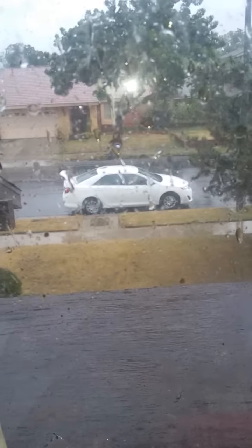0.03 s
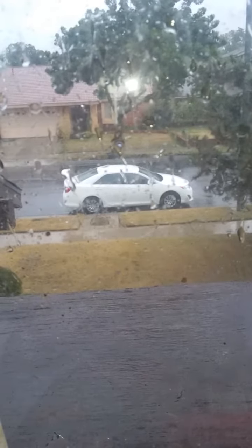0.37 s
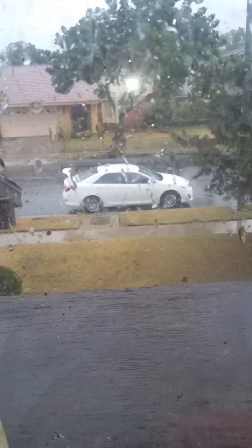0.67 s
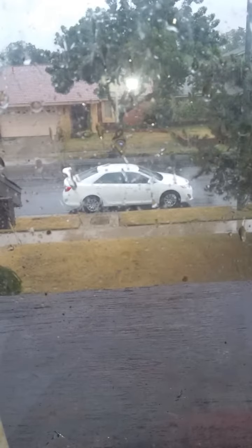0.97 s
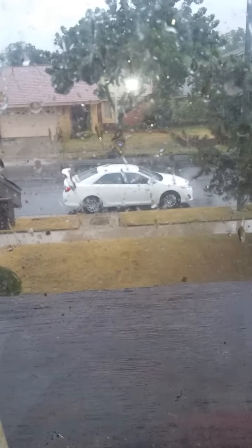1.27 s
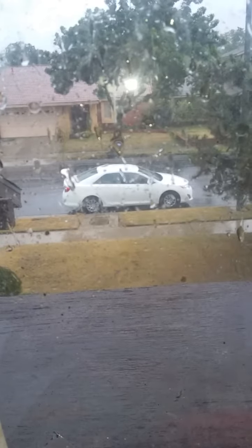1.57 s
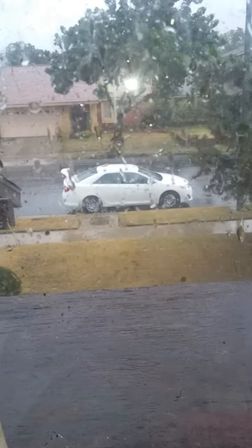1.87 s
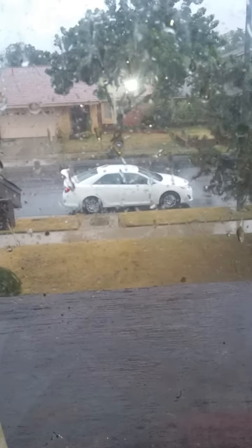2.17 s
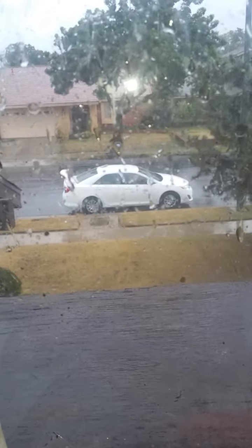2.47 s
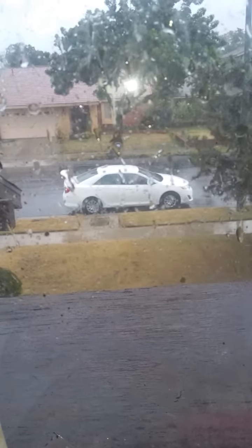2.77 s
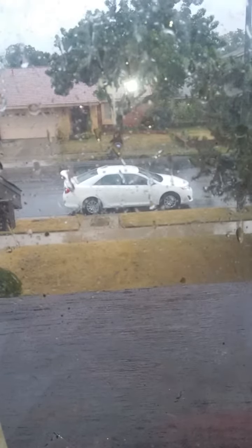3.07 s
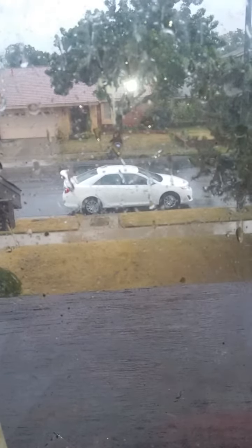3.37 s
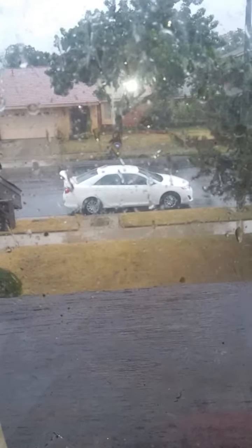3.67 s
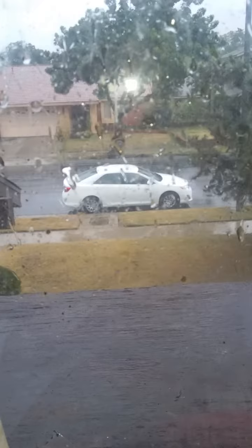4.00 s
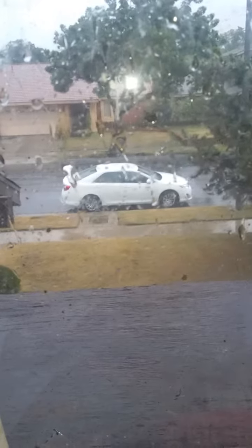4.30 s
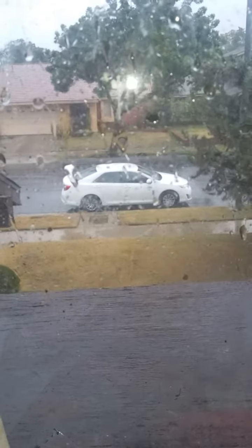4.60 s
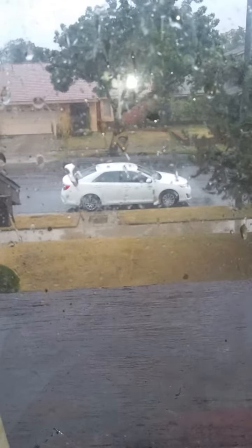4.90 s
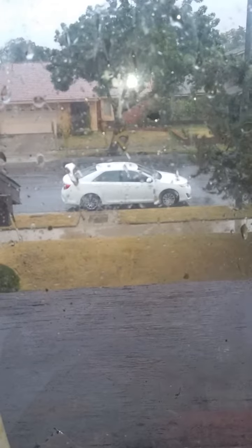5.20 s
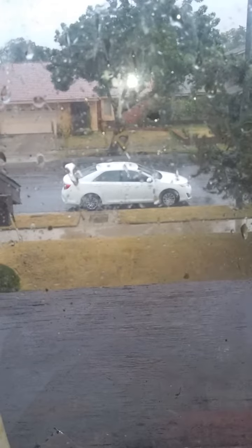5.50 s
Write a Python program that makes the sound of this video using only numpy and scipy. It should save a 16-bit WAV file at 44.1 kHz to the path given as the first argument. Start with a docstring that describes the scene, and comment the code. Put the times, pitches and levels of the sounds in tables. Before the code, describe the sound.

Steady rain hisses outside a window over a low wind drone, swelling and dipping unevenly, with three close drop ticks.

```python
"""Steady rain on a quiet street, heard from behind a window.
From the start, a wash of far drops and a finer near patter lie over a low drone of wind at the frame.
The level swells unevenly, with brief dips, to peaks near 2 s and 3 s, sinks at 4 s, swells, then fades.
Along the way fat drops tick close by: at 1.5 s, loudest at 3.3 s, last at 5.2 s."""
import sys
import numpy as np
from scipy import signal
from scipy.fft import rfft, irfft
from scipy.io import wavfile
from scipy.ndimage import uniform_filter1d

SR = 44100
rng = np.random.default_rng(int(sys.argv[2]) if len(sys.argv) > 2 else 0)


def pcm_store(signal):
    """Save signal as 16-bit PCM."""
    levels = np.round(np.clip(np.atleast_2d(signal), -1, 1) * 32767)
    wavfile.write(sys.argv[1], SR, levels.astype(np.int16).T)


N = 249165
USUAL_HISS_DB = -69.5  # reference for flutter and drone


def from_db(db):
    """Decibels to gain."""
    return 10 ** (np.asarray(db) / 20)


def rms_one(x):
    """Scale to rms 1."""
    return x / np.sqrt(np.mean(x ** 2) + 1e-20)


def level_db(x, window_s):
    """Running rms level."""
    power = uniform_filter1d(x ** 2, round(window_s * SR))
    return 10 * np.log10(np.maximum(power, 1e-14))


def curve(rows):
    """Interpolate (seconds, value) rows at every sample."""
    times_s, values = np.transpose(rows)
    return np.interp(np.arange(N) / SR, times_s, values)


def band(x, low_hz, high_hz):
    """Gentle band-pass."""
    return signal.sosfilt(signal.butter(2, [low_hz, high_hz], "band", fs=SR, output="sos"), x)


def drift(rate_hz):
    """Smooth random wander, rms about 1."""
    hop, settle = 40, 2000
    pole = np.exp(-2 * np.pi * rate_hz * hop / SR)
    noise = rng.standard_normal(N // hop + settle + 2)
    slow = signal.lfilter([1], [1, -2 * pole, pole * pole], noise)[settle:]
    return np.interp(np.arange(N) / hop, np.arange(len(slow)), rms_one(slow))


def hiss_level_db():
    """Level of the rain's hiss: slow swell, brief bell-shaped dips, random flutter."""
    # Slow swell and sinking of the hiss level. Each row: time in seconds, level in dB.
    swell = [(0.0, -79), (0.22, -72.5), (0.48, -80.5), (0.64, -75.5), (0.99, -66.5), (1.43, -67.5),
             (1.83, -62.5), (2.35, -64), (2.52, -74), (2.64, -69), (3.06, -63.5), (3.8, -72.5),
             (3.99, -81.0), (4.25, -68.2), (4.68, -63), (4.76, -69.0), (5.53, -72.1), (5.65, -80.3)]
    # Brief drops in level. Each row: centre in seconds, depth in dB, half-length in seconds.
    dips = [(0.067, 6, 0.0078), (0.303, 8.5, 0.025), (0.376, 9, 0.02), (0.457, 8.5, 0.026),
            (0.83, 6.5, 0.032), (1.148, 10, 0.045), (1.339, 5.5, 0.0087), (1.515, 4, 0.0061),
            (1.603, 4, 0.025), (2.157, 3, 0.059), (2.393, 5.5, 0.021), (2.553, 6.5, 0.017),
            (2.726, 4, .016), (3.188, 6, 0.042), (3.46, 2.5, .015), (3.519, 2.5, 0.014),
            (3.66, 3.5, 0.0082), (3.722, 3.5, 0.017), (4.777, 4, .02), (4.831, 3.5, .011),
            (5.133, 5.5, 0.0061), (5.19, 6.2, 0.039), (5.39, 6, 0.02), (5.561, 5.5, 0.017)]
    t = np.arange(N) / SR
    swell_db = curve(swell)
    dips_db = sum(depth_db * np.exp(-((t - centre_s) / half_s) ** 2) for centre_s, depth_db, half_s in dips)
    flutter_db = np.clip(0.63 + 0.08 * (USUAL_HISS_DB - swell_db), 0, 0.8)  # deeper when quiet
    flutter = rms_one(band(rng.standard_normal(N), low_hz=11.2, high_hz=25.7))
    return swell_db - dips_db + flutter_db * flutter


def drone_level_db(hiss_db, above_db, db_per_db, lead_s, trend_s):
    """The drone swings further than the hiss and runs ahead of each rise and fall."""
    trend_db = uniform_filter1d(hiss_db, round(trend_s * SR), mode="nearest")
    ahead_db = hiss_db + lead_s * np.gradient(trend_db) * SR
    return USUAL_HISS_DB + above_db + db_per_db * (ahead_db - USUAL_HISS_DB)


def wind_drone(waver_hz, waver_db):
    """Air across the window frame sounds one low note, unsteady in pitch and strength."""
    # Drone pitch. Each row: time in seconds, pitch in Hz.
    drone_pitch = [(0.0, 77.1), (1.12, 81.6), (1.4, 77.3), (2.63, 77.8), (2.72, 75.2), (4.45, 73.2),
                   (5.65, 74.7)]
    pitch_hz = curve(drone_pitch) + waver_hz * drift(rate_hz=12.3)
    strength = from_db(waver_db * drift(rate_hz=13))
    phase = 2 * np.pi * np.cumsum(pitch_hz) / SR
    return np.sqrt(2) * np.sin(phase) * strength


def fat_drops(ring_q, tick_t60_s, tail_t60_s, tail_db):
    """Each close drop is a sharp tick, then a short spray in the same band."""
    # Drops by the window. Each row: start in seconds, tick level in dB, ring in Hz.
    drops = [(1.475, -66.5, 3500), (3.273, -53, 4060), (5.234, -66, 4170)]
    out = np.zeros(N)
    for start_s, tick_db, ring_hz in drops:
        start = round(start_s * SR)
        age_s = np.arange(N - start) / SR
        fade = from_db(-60 * age_s / tick_t60_s) + from_db(tail_db - 60 * age_s / tail_t60_s)
        spray = band(rng.standard_normal(N), 3100, 6000)
        ringing = rms_one(signal.lfilter(*signal.iirpeak(ring_hz, ring_q, fs=SR), spray))
        out[start:] += from_db(tick_db) * ringing[start:] * fade
    return out


def wash_colour(x):
    """Give a flat sound the colour of rain and room; its 5-15 kHz hiss has rms 1."""
    # Spectrum of the rain and the air behind it. Each row: frequency in Hz, relative level in dB.
    spectrum = [(20, -22), (40, -16.5), (60, -8), (100, 7.5), (135, 6), (200, 0), (350, -6), (600, -7),
                (820, -12), (1300, -12.5), (1900, -15.5), (2400, -20), (3200, -25.5), (15500, -23)]
    # Low room modes and higher resonances. Each row: centre in Hz, width in Hz, lift in dB.
    resonances = [(56, 8.6, 15), (122, 5, 5), (141.2, 5.4, 3.5), (174.5, 6.1, 2), (210.4, 11, 3.5),
                  (990, 210, 3.5), (1330, 115, 3), (1885, 220, 1.5), (3990, 780, 4), (5030, 700, 2),
                  (5870, 110, 1), (6160, 660, 4.5), (7670, 5700, 1.86)]
    hz = np.maximum(np.arange(N // 2 + 1) * SR / N, 1)
    points_hz, points_db = np.transpose(spectrum)
    colour_db = np.interp(np.log(hz), np.log(points_hz), points_db)
    for centre_hz, width_hz, lift_db in resonances:
        colour_db += lift_db / (1 + (2 * (hz - centre_hz) / width_hz) ** 2)
    coloured = irfft(rfft(x) * from_db(colour_db), N)
    return coloured / np.std(band(coloured, 5000, 15000))


def splashes(per_s, spread_db):
    """Drops land at random: many small, a few large."""
    sizes = from_db(spread_db * np.minimum(rng.exponential(1, N), 4))
    signs = rng.choice([-1, 1], N)
    lands = rng.random(N) < per_s / SR
    return rms_one(sizes * signs * lands)


def rain(patter_db):
    """Countless far drops merge to a smooth wash; nearer ones patter in the middle range."""
    far = rng.standard_normal(N)
    near = band(splashes(per_s=900, spread_db=4.0), 300, 5000)
    return wash_colour(far + from_db(patter_db) * near)


def scene():
    """One level moves drone and rain together; the fat drops tick on top."""
    hiss_db = hiss_level_db()
    drone_db = drone_level_db(hiss_db, above_db=16, db_per_db=1.71, lead_s=0.023, trend_s=0.16)
    drone = from_db(drone_db) * wind_drone(waver_hz=0.47, waver_db=1.13)
    wash = from_db(hiss_db) * rain(patter_db=-7.5)
    ticks = fat_drops(ring_q=4.545, tick_t60_s=0.03, tail_t60_s=0.31, tail_db=-7.5)
    return (drone + wash + ticks)[None]


def expander(x, db_per_db, knee_db, fast_s, slow_s):
    """Below the knee the gain follows the momentary level, so lumps of rumble make the hiss flutter."""
    slow_db = level_db(x, slow_s)
    quiet = np.clip((knee_db - slow_db) / 10, 0, 1)
    swing_db = np.clip(level_db(x, fast_s) - slow_db, -6, 6)
    return x * from_db(db_per_db * quiet * swing_db)


def record(dry):
    """A soft expander works on the quiet passages; the deepest bass and the top are cut."""
    low_cut_hz, high_cut_hz = 38, 15720
    high_pass = signal.butter(3, low_cut_hz, "high", fs=SR, output="sos")
    low_pass = signal.ellip(12, 0.1, 70, high_cut_hz, fs=SR, output="sos")
    expanded = expander(dry, db_per_db=0.4, knee_db=-36.5, fast_s=0.0126, slow_s=0.036)
    return signal.sosfilt(low_pass, signal.sosfilt(high_pass, expanded))


dry = scene()
out = record(dry)
pcm_store(out)
```